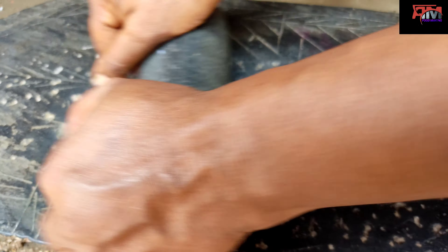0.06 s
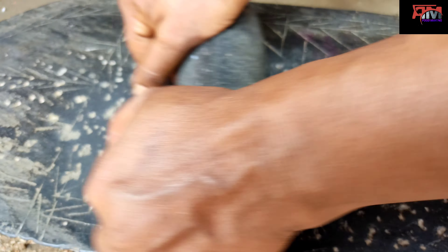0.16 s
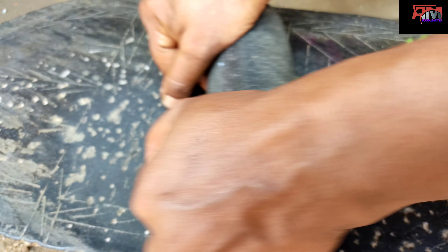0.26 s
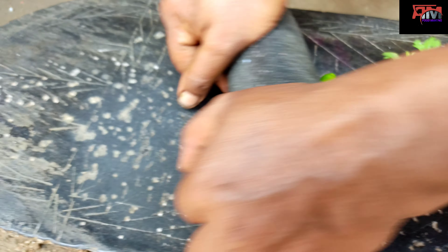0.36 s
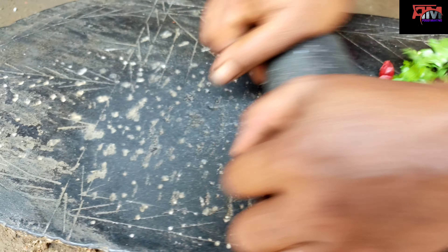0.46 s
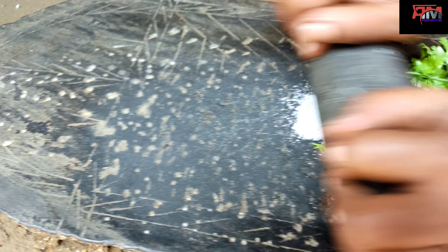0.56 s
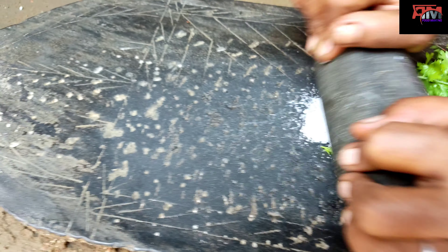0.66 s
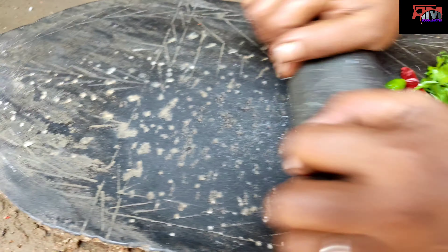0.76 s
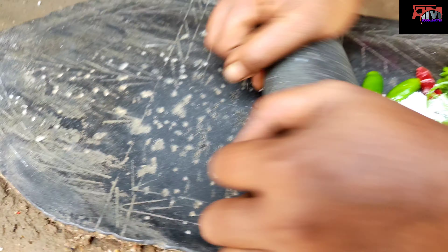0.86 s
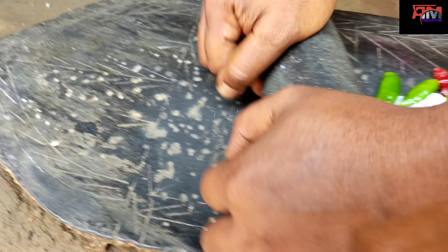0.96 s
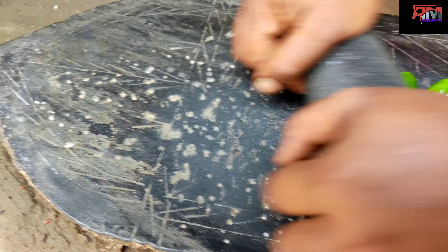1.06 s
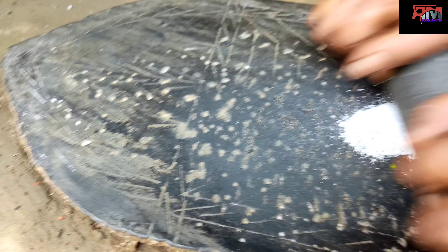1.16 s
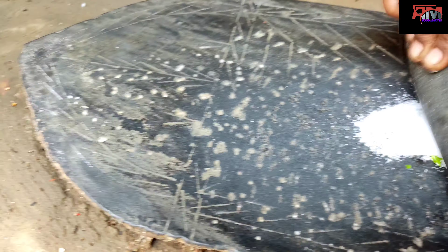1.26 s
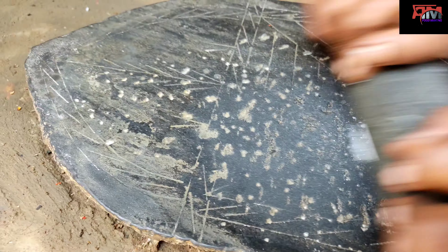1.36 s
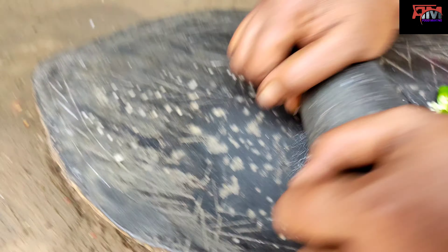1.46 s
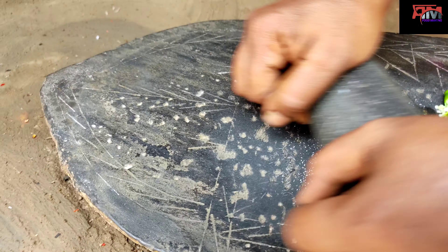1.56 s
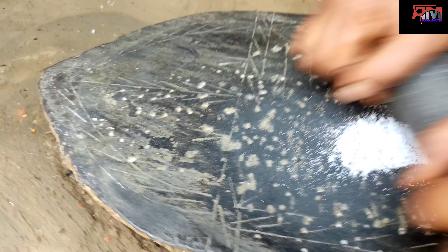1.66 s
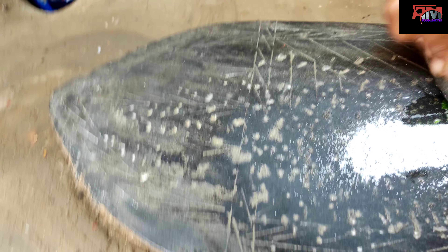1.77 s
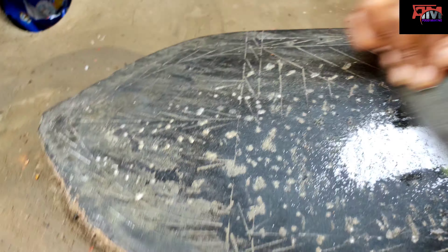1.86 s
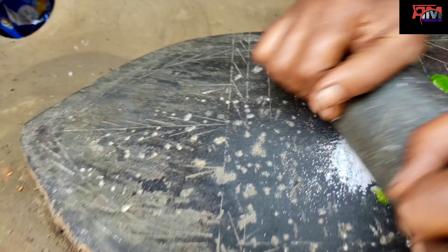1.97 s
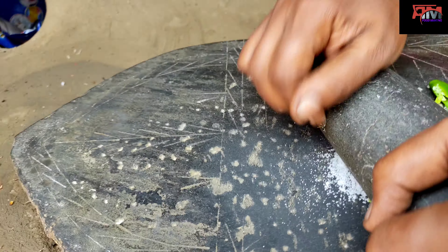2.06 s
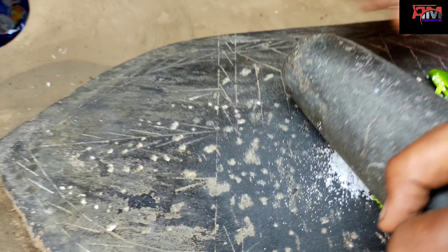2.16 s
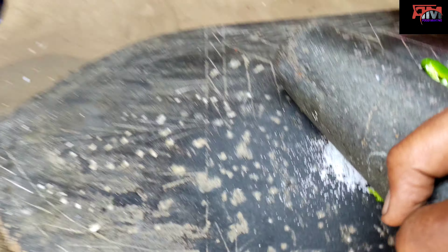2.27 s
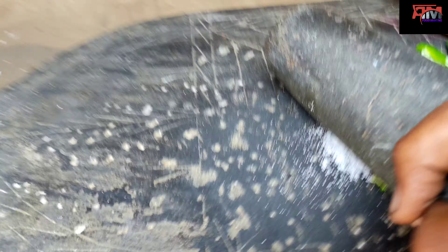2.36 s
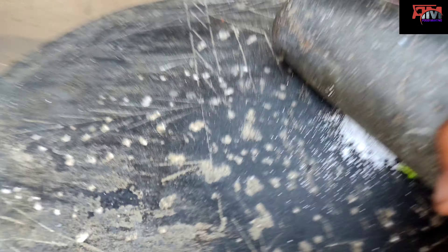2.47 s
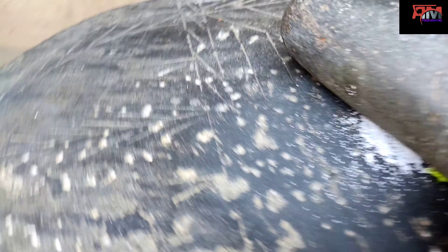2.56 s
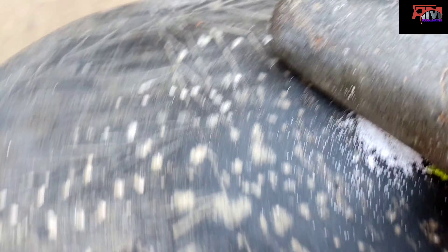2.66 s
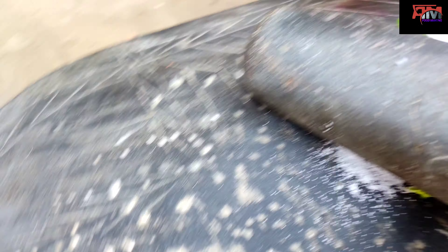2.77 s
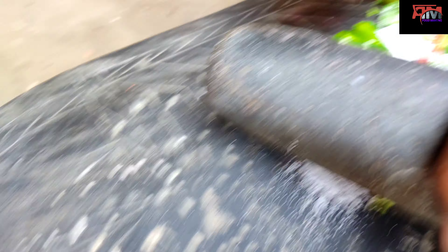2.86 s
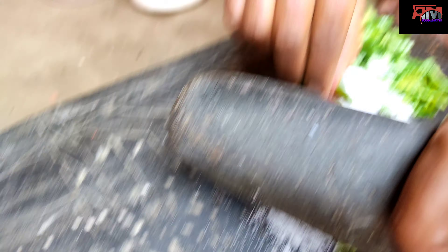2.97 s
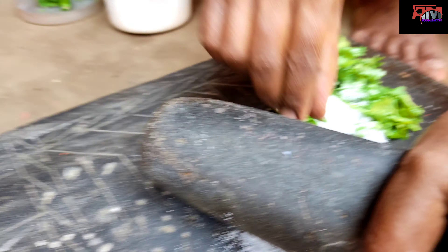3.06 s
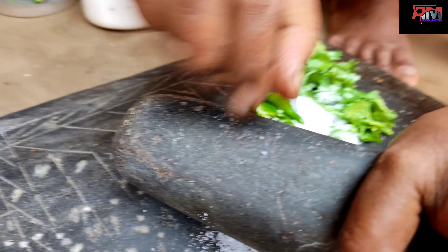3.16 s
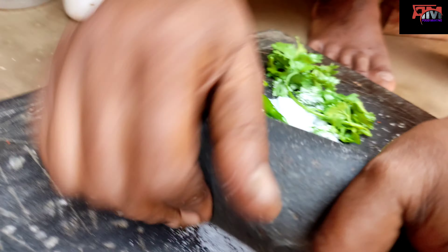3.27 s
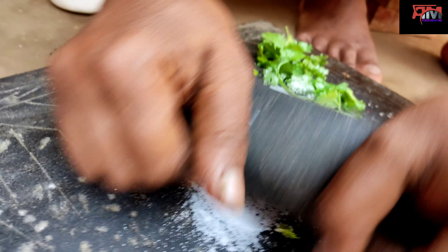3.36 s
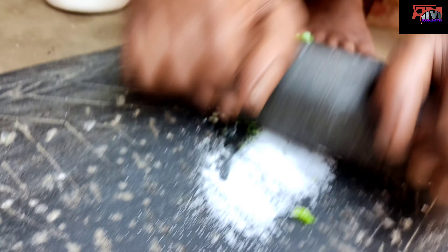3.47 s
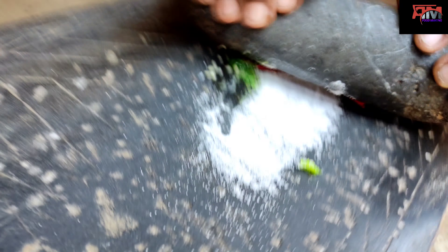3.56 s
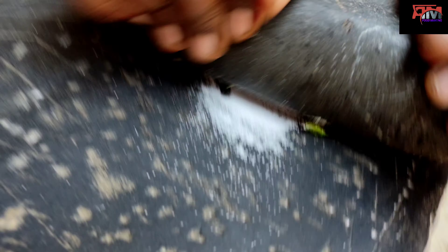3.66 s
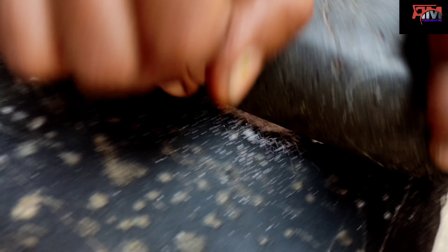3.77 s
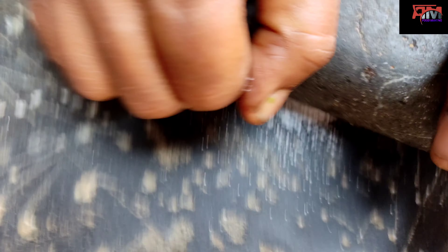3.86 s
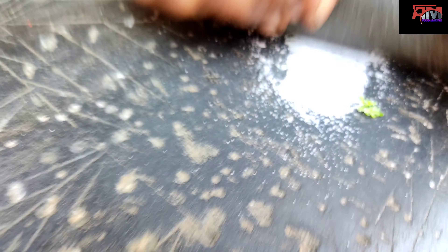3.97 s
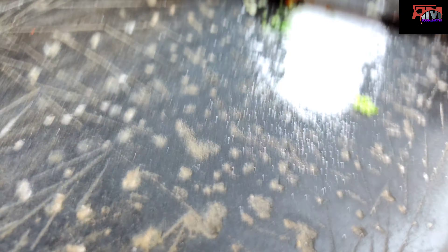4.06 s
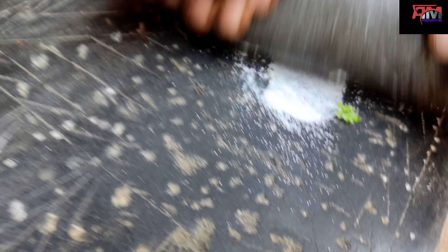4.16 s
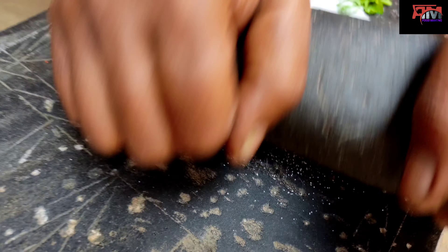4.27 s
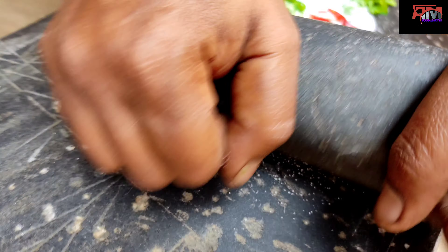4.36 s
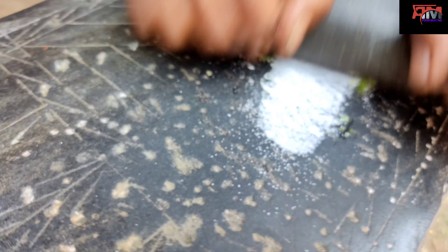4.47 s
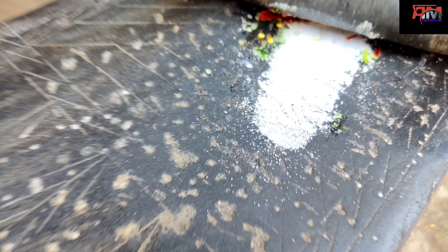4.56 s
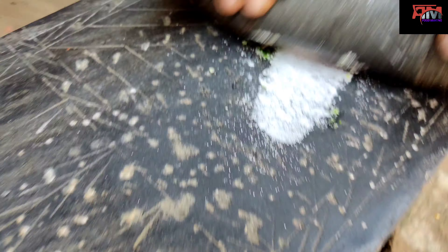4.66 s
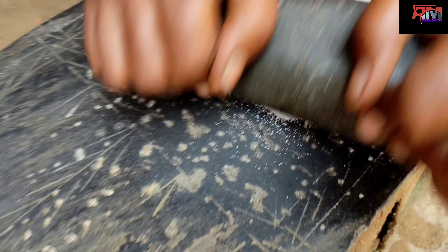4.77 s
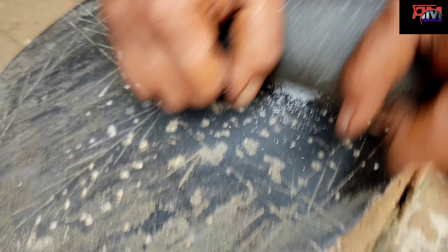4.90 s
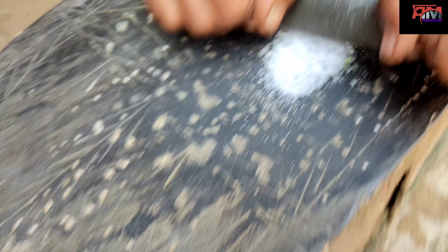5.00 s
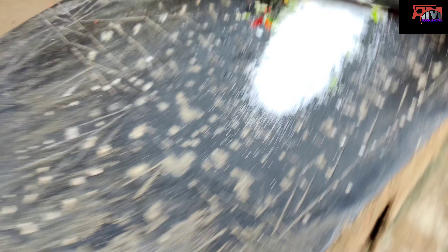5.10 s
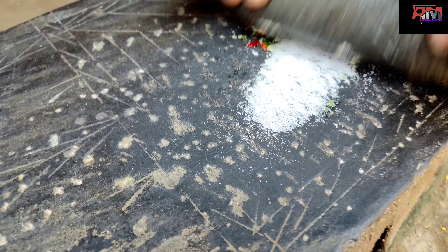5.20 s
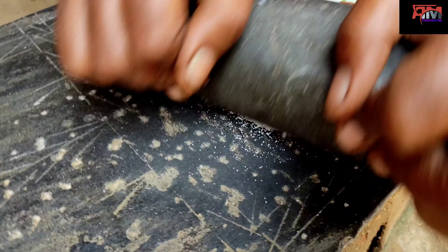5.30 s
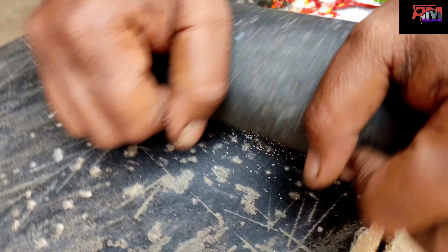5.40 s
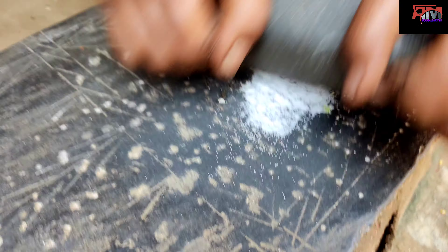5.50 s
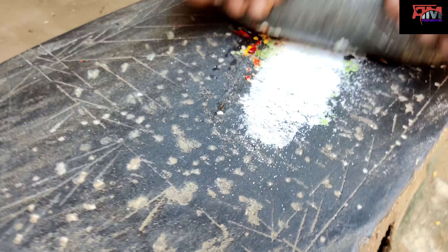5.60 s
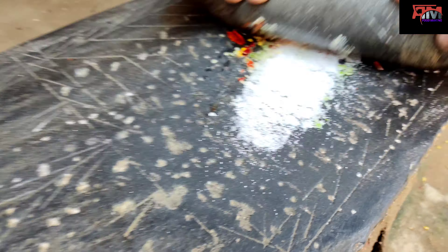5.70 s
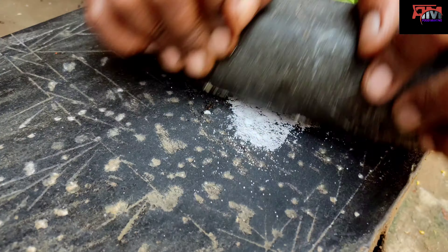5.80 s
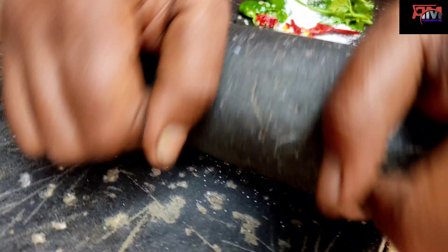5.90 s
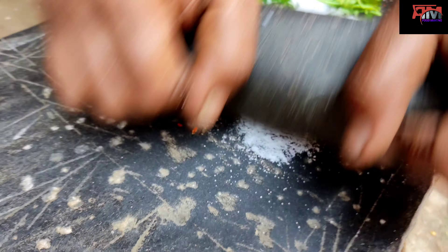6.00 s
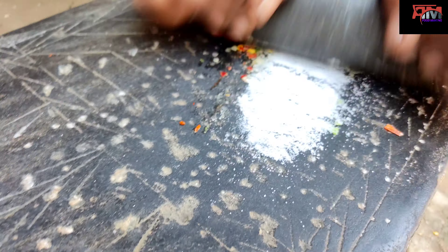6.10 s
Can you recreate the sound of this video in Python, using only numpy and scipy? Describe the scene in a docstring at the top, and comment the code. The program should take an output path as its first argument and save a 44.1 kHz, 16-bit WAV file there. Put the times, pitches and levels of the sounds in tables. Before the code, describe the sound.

Close by, a stone roller slides and scrapes unevenly over a flat stone slab, with a few hard knocks and stray grains snapping. It eases off briefly with a couple of dull bumps. Then it grinds through coarse salt in quick, regular back-and-forth strokes, the grains crunching brightly while the slab rumbles and the roller rings. The space is small and fairly dead, with a low airy hush and a very faint, distant insect.

```python
"""In a small, fairly dead room, a stone roller is worked to and fro on a stone slab close by.
It first slides, scrapes and is set down with hard knocks that excite the modes of both stones.
After a pause it is pushed through a heap of coarse salt: the grains crunch and snap by brittle
fracture, while friction between the pitted faces makes the slab rumble and the roller ring.
Under it lie a low airy noise and the faint trill of a far insect."""
import sys
import numpy as np
from scipy import signal
from scipy.fft import rfft, irfft
from scipy.io import wavfile
from scipy.ndimage import uniform_filter1d

SR = 44100
rng = np.random.default_rng(int(sys.argv[2]) if len(sys.argv) > 2 else 0)


def transcribe(u):
    """Save the signal u as a 16-bit wav file named by the first command-line argument.

    u: samples, shape (n,) or (channels, n), limited to [-1, 1]; the rate is SR.
    q: integer samples, one column per channel.
    """
    v = np.clip(np.atleast_2d(u).T, -1, 1)
    q = np.round(v * 32767).astype(np.int16)
    wavfile.write(sys.argv[1], SR, q)


N = 270774
TIME = np.arange(N) / SR

# Spectra: f/Hz, relative spectral level/dB
AIR_SPECTRUM = [(25, 3.5), (50, -5), (75, -4), (110, -6), (190, -1), (290, -11), (400, -4), (760, -14.5),
                (1260, -19.5), (1800, -19), (2400, -22.5), (2820, -22), (3900, -26.5), (6000, -31)]   # ambient noise
RUMBLE_SPECTRUM = [(50, -39), (95, -19), (165, -3.5), (230, -4.5), (350, 1), (470, -3.5), (590, -3.5),
                   (800, -9), (1100, -42.5), (2000, -43)]   # rubbed slab
BARE_RASP_SPECTRUM = [(450, -33), (750, 0), (950, -2.5), (1150, 0.5), (1400, -6), (1900, -9), (2800, -17),
                      (3400, -18.5), (4500, -18)]   # roller on bare stone
SALT_RASP_SPECTRUM = [(600, -23.5), (820, -9), (1000, -6), (1090, -17), (1200, -7.5), (1400, -7),
                      (1750, -13.5), (2200, -13.5), (2750, -13.5), (3400, -19), (4500, -37.5)]   # roller on salt
CLACK_SPECTRUM = [(80, -12), (200, -14), (450, -4), (750, -5), (1200, 12), (1800, 10), (2300, 6.5),
                  (2900, -7), (3500, -12), (5000, -36)]   # stone striking stone
SHUDDER_SPECTRUM = [(50, -35), (110, 3.5), (170, 4), (260, 5.5), (450, 6.5), (700, 3.5), (1500, -53),
                    (3000, -86)]   # struck slab shaking on the ground
FRACTURE_SPECTRUM = [(1500, -31), (2800, -15), (3700, -14), (4600, -13), (5200, -13), (6300, -6),
                     (7400, 0.5), (8600, -1.5), (9400, -11), (10300, -17), (12500, -15.5), (15500, -23.5)]   # grains breaking
BITE_SPECTRUM = [(1500, -3), (2800, -8), (3500, -10), (4400, -2.5), (5200, -6.5), (6200, -4), (7500, -9.5)]   # low-treble bite of a snapping grain
# Treble balance of the fractures: f/Hz, left-right/dB
TREBLE_BALANCE = [(1500, -15.5), (2800, -3.5), (4500, 2.5), (6500, -2), (7400, -6.5), (8400, 12),
                  (9500, 11), (12000, 2), (15500, 5)]

# Resonances: f/Hz, bandwidth/Hz, relative level/dB, left-right/dB
RASP_MODES = [(1079, 89, -1, 4), (1300, 140, 1.5, 1)]   # roller scraping bare stone
WEDGE_MODES = [(2600, 160, 0.5, -4.5), (3193, 110, 0, 1.5), (4570, 170, -9, -4), (5880, 150, 1.5, -1.5),
               (6490, 240, 0.5, -1)]   # wedge of air between roller and slab
SLAB_MODES = [(331, 35, -9.5, 7), (464, 26, 2, -11)]   # hollow growl of the slab
BOOM_MODES = [(165.4, 42, 0, 2)]   # deep boom of the whole slab
HOLLOW_MODES = [(350, 128, 0, -1)]   # hollow under the roller
ROLLER_MODES = [(1083, 36, -1, 0.5), (2820, 170, -13.5, -7)]   # roller under a firm push
ROLLER_HIGH_MODES = [(4530, 220, -8.5, -4.5), (5776, 81, -1, -9), (6560, 580, -8, -4)]   # its treble ring
GRIT_MODES = [(4400, 60, -10, -11), (5540, 38, -2, 11), (6330, 31, 1, -1), (6840, 38, 3, 12),
              (7455, 110, 10, -5.5), (7870, 54, 6, -5.5), (8220, 85, 6.5, 15.5), (8700, 76, 7, -7),
              (9030, 130, 7, 10), (9500, 50, -3.5, -8)]   # stones excited by breaking grains
# Resonances of the sliding roller: the same four columns, left-right correlation, onset delay/s
SLIDE_MODES = [(380, 190, -15.5, 6, 0.89, 0.2), (745, 73, -3, -3.5, 0.8, 0.16),
               (1164, 110, -2, 1, -0.59, 0.023), (1900, 270, -18, -14, -0.83, 0.079),
               (2950, 340, -16.5, -5.5, -0.26, 0.17)]
# Modes of the struck stones: f/Hz, level/dB, T60/s, left-right/dB, right lag/rad, share of bending
STRUCK_MODES = [(160.1, -17, 0.29, 1, 0.095, 0), (249, -11, 0.15, 3, .4, 0),
                (389, 5.5, 0.038, 4.5, 0.48, 0), (620, -3.5, 0.056, -3, 0.76, 0),
                (872, -7, 0.064, 12, 3.9, 0), (1075, -2, 0.069, 2.5, 0.74, 0.85),
                (1280, 7.5, 0.017, 8, 2.1, 0.01), (1407, 5.5, 0.058, -2, 1.6, 0.1),
                (1550, -6, 0.024, -7, 4.5, 0.8), (1940, -1.5, 0.005, 24, 0.73, 0),
                (2360, 10, 0.0082, 6, 0.56, 0.05), (2550, 2.5, 0.032, -16, 2.44, 0.24),
                (2870, -10.5, 0.079, -4, 2.4, 1), (3210, -19, 0.051, -6, 1.1, 0.75)]

# Insect chirps: t/s, duration/s, relative level/dB
INSECT_CHIRPS = [(0.0, 0.14, -60), (0.243, 0.13, -55.5), (0.387, 0.11, -61.5), (0.966, 0.067, -59.5),
                 (2.57, 0.11, -63), (2.678, 0.12, -56.5), (2.815, 0.092, -57), (2.954, 0.11, -58),
                 (3.121, 0.11, -68.5), (3.233, 0.073, -61.5)]
# The slab bumps on the ground: t/s, level/dB
SLAB_BUMPS = [(2.382, -36), (2.957, -46.5)]
# The roller catches and groans: t/s, half-width/s, f/Hz, level/dB
ROLLER_GROANS = [(0.882, 0.018, 860, -37), (1.169, 0.02, 1110, -44.5), (1.99, 0.027, 1095, -44)]
# Knocks, levels relative: t/s, level/dB, contact cutoff/Hz, slab thud/dB, roller bending/dB,
# struck spot f/Hz, struck spot/dB, clack/dB, rebound/dB
ROLLER_KNOCKS = [(0.646, -15, 3300, -5.5, -11, 1380, 5, 7, -18),
                 (0.7343, -35.5, 2500, 2, -7.5, 1363, -0.5, -0.5, -13.5),
                 (1.11, -42.5, 2576, 0.5, -11, 1300, -7.5, 0.5, -14),
                 (1.3051, -16, 2760, -3, -10, 2530, 11.5, 4, -14),
                 (1.8772, -31, 1900, 4, -10, 1305, 17, 0, -18),
                 (1.9410, -38.5, 1900, 3, 2, 1324, 17.5, 0.5, -14),
                 (2.1357, -44, 1333, 12, 25, 1260, 12, 5.5, -12), (2.804, -51, 1310, 6, -3, 900, 14, 0, -9),
                 (3.7247, -27, 3275, 4.5, 15.5, 3050, 4.5, 2, -5.5),
                 (4.0731, -27.5, 2870, 0, 0.5, 1438, 5, -3, -11),
                 (4.2175, -23, 4520, 2.5, 19, 1427, 14.5, 1, -19)]
# Strokes on nearly bare stone, levels relative: t/s, duration/s, rumble/dB, rasp/dB, grit/dB, ring/dB
SCRAPES = [(0.46, 0.16, -45.5, -42.5, -46.5, -47.5), (0.6, 0.15, -45, -43, -38.5, -45.5),
           (0.74, 0.22, -39, -38, -44, -47.5), (0.83, 0.11, -40.5, -38, -64, -52.5),
           (1.09, 0.23, -40, -39.5, -53.5, -48), (1.28, 0.34, -35, -35.5, -46, -44),
           (1.61, 0.37, -43, -41.5, -47, -47.5), (1.868, 0.22, -36, -39, -37, -43.5),
           (2.04, 0.28, -65, -50.5, -55, -57.5), (2.47, 0.46, -70, -53.5, -44.5, -55.5),
           (3.07, 0.12, -70, -56, -46.5, -52), (3.21, 0.21, -59, -55.5, -44.5, -56)]
# Strokes in salt: the same six columns, boom/dB, delay to the heap/s, heap crunch/dB
SALT_PULLS = [(3.309, 0.29, -41, -40.5, -39.5, -48, -55.5, 0.25, -23),
              (3.891, 0.25, -39, -38, -44, -44, -49, 0.17, -23),
              (4.42, 0.235, -40.5, -37.5, -43.5, -37.5, -46.5, 0.19, -33),
              (4.932, 0.27, -43, -40, -46.5, -39, -50.5, 0.17, -30),
              (5.48, 0.245, -44.5, -42, -44, -42, -50, 0.155, -34),
              (6.003, 0.38, -41.5, -38.5, -41, -37, -51, 0.16, -33.5)]
SALT_PUSHES = [(3.618, 0.23, -39, -39, -38.5, -42.5, -45.5, 0.058, -14.5),
               (4.126, 0.27, -39, -39, -47, -40, -58.5, 0.069, -21),
               (4.663, 0.24, -36.5, -39, -42.5, -35, -55, 0.057, -26.5),
               (5.196, 0.26, -39, -38, -44, -37.5, -46.5, 0.066, -29.5),
               (5.717, 0.28, -41, -41, -48, -38, -50.5, 0.11, -28.5)]
# Stray patches of grains under the roller: t/s, half-width/s, level/dB
GRAIN_PATCHES = [(0.324, 0.029, -43), (0.567, 0.039, -35.5), (0.769, 0.036, -35), (0.834, 0.013, -30),
                 (1.261, 0.057, -43), (1.402, 0.063, -33.5), (2.65, 0.016, -41.5), (4.822, 0.013, -42.5),
                 (5.453, 0.036, -38)]
# Single coarse grains snap: t/s, relative level/dB, low-treble bite/dB
GRAIN_SNAPS = [(0.309, -20, -19), (0.354, -26.5, -2), (0.4852, -28, -5), (0.5421, -27.5, 10.5),
               (0.5492, -29, 12), (0.629, -23.5, 1), (0.636, -20.5, 2), (0.641, -19, 1.5), (0.653, -20, 0),
               (0.7455, -25, 4), (0.77, -19.5, 3), (0.8092, -16, 9), (0.8176, -11.5, -4), (0.964, -34, 5.5),
               (1.0827, -36, -1.5), (1.2518, -21.5, 3.5), (1.2598, -20.5, 1.5), (1.2864, -19.5, -3),
               (1.372, -22, 7), (1.3982, -21.5, 8.5), (1.8252, -17.5, -11.5), (2.9617, -34, -17),
               (3.058, -31.5, -7), (3.116, -27.5, -3.5), (3.5383, -14.5, 5.5), (3.561, -13, -12.5),
               (3.574, -15.5, -14), (3.5813, -9.5, -21.5), (3.6328, -16, -5), (3.6473, -18.5, -13),
               (3.662, -24, -23), (4.024, -31, -14.5), (4.0568, -11, -20), (4.0831, -15, -20),
               (4.1263, -11, -20), (4.137, -10, -28), (4.6773, -21, -18), (4.6968, -17.5, 1),
               (5.1928, -17, -20), (5.2152, -7.5, -30), (5.2245, -22.5, -24.5)]

# Swell of a stroke: (skew, under 1 peaks early; steepness)
SLIDE_SHAPE, SCRAPE_SHAPE, PULL_SHAPE, PUSH_SHAPE = (0.88, 2.1), (0.73, 1.71), (1.06, 1), (0.69, 1.15)
RING_PULL_SHAPE, RING_PUSH_SHAPE = (1.03, 3), (0.66, 2.04)
SLIDE_START_S, SLIDE_LENGTH_S = -0.037, 0.51


def from_db(db):
    """Amplitude ratio of a level in decibels."""
    return 10 ** (np.asarray(db) / 20)


def to_db(gain):
    """Level in decibels of an amplitude ratio."""
    return 20 * np.log10(gain + 1e-6)


def rms_one(x):
    """Normalisation to unit mean power."""
    return x / np.sqrt(np.mean(x ** 2) + 1e-20)


def panned(db):
    """Direction by level difference: left and right gains."""
    return from_db(np.array([[db], [-db]]) / 2)


def lowpass(order, hz):
    """Maximally flat low-pass filter sections."""
    return signal.butter(order, hz, fs=SR, output="sos")


def resonator(hz, width_hz):
    """Second-order resonance as a band-pass section."""
    return signal.butter(1, [hz - width_hz / 2, hz + width_hz / 2], "band", fs=SR, output="sos")


def colour(x, spectrum):
    """Minimum-phase filtering: a folded cepstrum gives a causal response with this spectrum."""
    size = 2048
    hz, db = np.transpose(spectrum)
    log_hz = np.log(np.maximum(np.arange(size + 1) * SR / size / 2, 1))
    outside = np.maximum(np.log(hz[0]) - log_hz, 0) + np.maximum(log_hz - np.log(hz[-1]), 0)
    cepstrum = irfft(np.log(from_db(np.interp(log_hz, np.log(hz), db) - 20 * outside)))
    cepstrum[1:size] *= 2
    cepstrum[size + 1:] = 0
    response = irfft(np.exp(rfft(cepstrum)))[:size]
    return signal.fftconvolve(np.atleast_2d(x), response[None], axes=1)[:, :x.shape[-1]]


def drift(per_s):
    """Random modulation of unit rms, interpolated between knots."""
    knots = rng.standard_normal(int(TIME[-1] * per_s) + 2)
    return rms_one(np.interp(TIME * per_s, np.arange(len(knots)), knots))


def read_at(x, positions):
    """Linear interpolation of both sides at fractional sample positions."""
    return np.array([np.interp(positions, np.arange(N), side) for side in x])


def bend(x, pitch):
    """Resampling scales all frequencies by a time-varying ratio."""
    return read_at(x, np.cumsum(pitch) % (N - 1))


def impacts(per_s, spread_db):
    """Shot noise: independent impulses of random size and sign, at unit rms."""
    chance = np.clip(per_s / SR, 1e-4, 1)
    sizes = from_db(spread_db * np.minimum(rng.exponential(1, N), 4)) * rng.choice([-1, 1], N)
    return rms_one((rng.random(N) < chance) * sizes / np.sqrt(chance))


def contact(per_s, spread_db, alike):
    """Partial correlation: some impacts reach both sides alike, others only one."""
    shared, left, right = (impacts(per_s, spread_db) for _ in range(3))
    common = np.sqrt(abs(alike)) * np.array([shared, np.sign(alike) * shared])
    return common + np.sqrt(1 - abs(alike)) * np.array([left, right])


def resonate(modes, per_s, alike, wander_db, shift=0):
    """Forced resonance: impacts ring modes whose level and pitch wander as the contact moves."""
    out = 0
    drives = [contact(per_s, spread_db=1.0, alike=alike) for _ in range(2)]
    for k, (hz, width, db, pan_db) in enumerate(modes):
        peak_and_skirt = np.vstack([resonator(hz, width), resonator(hz, min(5 * width, hz))])
        mode = rms_one(signal.sosfilt(peak_and_skirt, drives[k % 2] + 1e-18))
        if shift:
            mode = bend(mode, 1 + shift * np.tanh(drift(7)))
        out = out + from_db(db + wander_db * np.tanh(drift(16))) * panned(pan_db) * mode
    return rms_one(out)


def echoes(x, t60, dull_hz):
    """Diffuse reverberation: an exponentially decaying noise tail, different on each side."""
    t = np.arange(int(t60 * SR) + 2) / SR
    tail = rng.standard_normal((2, len(t))) * from_db(-60 * t / t60) * (1 - np.exp(-20 * t / t60))
    tail /= np.sqrt(np.sum(tail ** 2, axis=1, keepdims=True))
    tail = signal.sosfilt(lowpass(1, dull_hz), tail)
    return signal.fftconvolve(x, tail, axes=1)[:, :N]


def speed(start, length, shape, turn_s=0.031):
    """A swell within 0-1, smoothed as inertia smooths the start and stop of a stroke."""
    skew, steepness = shape
    progress = np.clip((TIME - start) / length, 0, 1)
    swell = np.abs(np.sin(np.pi * progress ** skew)) ** steepness
    return np.abs(uniform_filter1d(swell, 2 * int(turn_s * SR) + 1))


def strokes(rows, shape, count):
    """Friction noise follows speed: a gain curve for each of the first `count` level columns."""
    return sum(from_db(levels[:count])[:, None] * speed(start, length, shape)
               for start, length, *levels in rows)


def salt_strokes():
    """Superposed pulls and pushes: gains of rumble, rasp, grit, ring and boom."""
    return strokes(SALT_PULLS, PULL_SHAPE, count=5) + strokes(SALT_PUSHES, PUSH_SHAPE, count=5)


def crossing(s, half_width_s, db):
    """Gaussian envelope of the roller passing over one spot."""
    return from_db(db) * np.exp(-((TIME - s) / half_width_s) ** 2)


def air():
    """Ambient noise: dense shot noise merges into a low, airy hush."""
    return from_db(-51.95) * rms_one(colour(contact(20000, 0.33, alike=0.56), AIR_SPECTRUM)) * panned(3.4)


def insect(carrier_hz=2800, trill_hz=37):
    """Amplitude modulation of a thin tone gives a far insect's trill, which swells and ebbs."""
    pitch_hz = carrier_hz + 20 * drift(220)
    swell = from_db(-74) + sum(from_db(db) * speed(s, length, (1, .5)) for s, length, db in INSECT_CHIRPS)
    pulse_hz = trill_hz * (1 + 0.13 * drift(4.5))
    trill = 1 + 0.13 * np.sin(2 * np.pi * np.cumsum(pulse_hz) / SR)
    flicker = from_db(2.6 * drift(83) + 2.0)
    return swell * trill * flicker * np.sin(2 * np.pi * np.cumsum(pitch_hz) / SR)


def bumps(start_hz=326, end_hz=50.1, fall_s=0.0148, swell_s=0.0064):
    """Damped oscillation of the slab on the ground, dropping in pitch as the weight settles."""
    out = 0
    for s, db in SLAB_BUMPS:
        t = np.clip(TIME - s, 0, 1)
        pitch_hz = end_hz + (start_hz - end_hz) * np.exp(-t / fall_s)
        swell = t / swell_s * np.exp(1 - t / swell_s)
        out = out + from_db(db) * swell * np.sin(2 * np.pi * np.cumsum(pitch_hz * (t > 0)) / SR)
    return out * panned(5.7)


def groans(fall_octaves_per_s=6):
    """Stick-slip of stone on stone briefly drives one falling resonance."""
    out = 0
    for s, half_width_s, hz, db in ROLLER_GROANS:
        pitch = 2 ** np.clip(fall_octaves_per_s * (s - TIME), -.5, .5)
        tone = resonate([(hz, 140, 0, 0)], per_s=900, alike=0.47, wander_db=0.5)
        out = out + crossing(s, half_width_s, db) * bend(tone, pitch)
    return out


def slide(sag_per_s=0.36):
    """Light sliding friction excites broad resonances of the loose roller, which sink as it travels."""
    out, elapsed = 0, TIME - SLIDE_START_S
    for hz, width, db, pan_db, alike, after in SLIDE_MODES:
        skirt = signal.butter(1, [hz * .7, hz / .7], "band", fs=SR, output="sos")
        mode = signal.sosfilt(np.vstack([resonator(hz, width), skirt]), contact(2500, 1.9, alike))
        onset = (1 + np.tanh((elapsed - after) / 0.036)) / 2
        out = out + from_db(db) * panned(pan_db) * onset * rms_one(mode)
    pitch = 1 - sag_per_s * (np.clip(elapsed, 0, SLIDE_LENGTH_S) - SLIDE_LENGTH_S / 2)
    sinking = rms_one(read_at(out, np.cumsum(pitch)))
    return speed(SLIDE_START_S, SLIDE_LENGTH_S, SLIDE_SHAPE) * from_db(-34 + 2.0 * drift(74)) * sinking


def rubbing(rumble_db, rasp_db, rasp_spectrum, judder_db):
    """Roughness noise: pits catch on each other, so the slab rumbles, the roller rasps, both judder."""
    judder = from_db(judder_db * drift(90))
    catches = contact(3000, spread_db=1.5, alike=0.93) * np.sqrt(judder)   # the heavy slab judders less
    slab = rms_one(colour(catches, RUMBLE_SPECTRUM)) * panned(3.7)
    roller = rms_one(colour(contact(1500, spread_db=-1.0, alike=0.06) * judder, rasp_spectrum))
    return from_db(rumble_db) * slab + from_db(rasp_db) * roller


def scraping():
    """Friction on nearly bare stone drives the resonances of the roller and the air wedge beneath it."""
    slab_db, roller_db, _, ring_db = to_db(strokes(SCRAPES, SCRAPE_SHAPE, count=4))
    rasp = resonate(RASP_MODES, per_s=600, alike=0.26, wander_db=-0.5, shift=0.02)
    rasp *= from_db(roller_db - 11.5)
    ring = resonate(WEDGE_MODES, per_s=600, alike=0.053, wander_db=-0.5, shift=0.012)
    ring *= from_db(ring_db) + from_db(-51.5) * speed(SLIDE_START_S, SLIDE_LENGTH_S, SLIDE_SHAPE)
    flicker = from_db(2.0 * drift(90))
    friction = rubbing(slab_db - 2.5, roller_db - 4.5, BARE_RASP_SPECTRUM, judder_db=4.0)
    return flicker * (rasp + ring) + friction


def struck_modes(t, thud_db, bend_db):
    """Free modal decay: where the blow lands decides how much the slab thuds and the roller bends."""
    out = 0
    for k, (hz, db, t60, pan_db, lag, bending) in enumerate(STRUCK_MODES):
        place_db = thud_db if hz < 900 else bending * bend_db
        swell = 1 - np.exp(-t * hz / 0.27)   # low modes build up more slowly
        gripped_hz = hz * (1 + 0.0047 * rng.standard_normal())   # the grip detunes each mode
        phase = 2 * np.pi * gripped_hz * t + np.array([[lag], [-lag]]) / 2
        ring = swell * np.sin(phase) * from_db(-60 * t / t60)
        out = out + (-1) ** k * from_db(db + place_db - 1.0) * panned(pan_db) * ring
    return out


def knocks(rebound_s=0.006, spot_t60_s=0.047, spot_split=0.025):
    """Impact excitation: a clack, a low shudder and ringing modes; softer contact cuts the treble."""
    t = np.arange(SR // 3) / SR
    out = np.zeros((2, N + len(t)))
    for s, db, hard_hz, thud_db, bend_db, spot_hz, spot_db, clack_db, rebound_db in ROLLER_KNOCKS:
        chatter = rng.standard_normal((2, len(t))) * np.exp(-t / 0.0065)   # faces grate as they settle
        touches = (t == 0) + from_db(rebound_db) * (np.arange(len(t)) == int(rebound_s * SR))
        blow = from_db(clack_db) * colour(from_db(18) * touches + chatter, CLACK_SPECTRUM)
        shudder = colour(rng.standard_normal(len(t)) * np.exp(-t / 0.0095), SHUDDER_SPECTRUM)
        blow += from_db(thud_db + 5.0) * panned(4.6) * shudder
        blow += struck_modes(t, thud_db, bend_db)
        # the struck spot rings as a close pair of tones
        pair = sum(np.sin(2 * np.pi * spot_hz * (1 + side * spot_split / 2) * t) for side in (-1, 1))
        blow += from_db(spot_db - 16.5) * pair * from_db(-60 * t / spot_t60_s)
        start = int(s * SR)
        out[:, start:start + len(t)] += from_db(db) * signal.sosfilt(lowpass(2, hard_hz), blow)
    return out[:, :N]


def hollow(fall_octaves=0.6):
    """Cavity resonance: the hollow under the roller growls and sinks in pitch through each push."""
    octaves = sum(fall_octaves * (.5 - (TIME - start) / length) * (TIME > start) * (TIME < start + length)
                  for start, length, *_ in SALT_PUSHES)
    growl = bend(resonate(HOLLOW_MODES, per_s=700, alike=0.45, wander_db=1.0), 2 ** octaves)
    return from_db(-0.5) * strokes(SALT_PUSHES, PUSH_SHAPE, count=1)[0] * growl


def grinding():
    """Forced vibration in the salt: the slab growls and booms, and the roller rings."""
    slab_db, roller_db, _, ring_db, boom_db = to_db(salt_strokes())
    growl = from_db(slab_db - 12) * resonate(SLAB_MODES, per_s=1900, alike=0.39, wander_db=-0.7)
    boom = from_db(boom_db) * resonate(BOOM_MODES, per_s=1500, alike=0.85, wander_db=-2.5)
    pull_ring = strokes(SALT_PULLS, RING_PULL_SHAPE, count=4)[3]
    push_ring = strokes(SALT_PUSHES, RING_PUSH_SHAPE, count=4)[3]
    ring = resonate(ROLLER_MODES, per_s=2700, alike=0.51, wander_db=2.0, shift=0.025)
    ring *= from_db(-4) * (pull_ring + push_ring)
    fits = rms_one(from_db(4 * np.tanh(drift(45))))   # the high modes catch only in fits
    high_ring = resonate(ROLLER_HIGH_MODES, per_s=600, alike=0.067, wander_db=6.5, shift=0.014)
    high_ring *= from_db(ring_db - 3.5) * fits
    resonances = growl + boom + hollow() + ring + high_ring
    return resonances + rubbing(slab_db - 6.5, roller_db - 7, SALT_RASP_SPECTRUM, judder_db=3.0)


def brighten(cracks):
    """Spectral shaping: fractures sound bright, with a different treble on each side."""
    bright = colour(cracks, FRACTURE_SPECTRUM)
    return np.vstack([colour(side, [(hz, sign * db / 2) for hz, db in TREBLE_BALANCE])
                      for side, sign in zip(bright, (1, -1))])


def snaps(splinter_s=0.0032):
    """Brittle fracture of a coarse grain: a crack and splinters; some snaps add a low-treble bite."""
    t = np.arange(SR // 40) / SR
    cracks, bites = np.zeros((2, 2, N + len(t)))
    for s, db, bite_db in GRAIN_SNAPS:
        splinters = rng.standard_normal((3, len(t))) * np.exp(-t / splinter_s)
        burst = from_db(db + 1.5) * (1.1 * (t == 0) + 0.11 * splinters[0] + 0.74 * splinters[1:])
        start = int((s + 0.00056) * SR)
        cracks[:, start:start + len(t)] += burst
        bites[:, start:start + len(t)] += from_db(bite_db - 3) * burst
    softened = signal.sosfilt(lowpass(3, 10500), cracks[:, :N])
    return brighten(softened) + colour(bites[:, :N], BITE_SPECTRUM)


def moving_contact(cracks, stretch_s=0.17):
    """Modal overlap: each stretch of the way rings a different crowd of the stones' high modes."""
    out, hop = np.zeros((2, 2 * N)), int(stretch_s * SR)
    for centre in range(0, N + hop, hop):
        near = np.arange(max(centre - hop, 0), min(centre + hop, N))
        window = np.cos(np.pi / 2 * (near - centre) / hop)
        ring = echoes(cracks[:, near] * window, t60=0.055, dull_hz=15400)
        out[:, near[0]:near[0] + ring.shape[1]] += ring
    return out[:, :N]


def wedge_echo(x, delay_s=0.0017, reflection=0.3):
    """Comb filtering by one echo between roller and slab, whose delay wanders as the roller moves."""
    lag = delay_s * SR * (1 + 0.013 * drift(8.7))
    return rms_one(x + reflection * read_at(x, np.arange(N) - lag))


def pings(per_s, modes=44, t60_s=0.15):
    """Impulse response: each bursting grain rings one of the stones' many high modes."""
    out = 0
    count = int(np.mean(per_s) * TIME[-1] / modes) + 1
    cumulative_share = np.cumsum(per_s) / np.sum(per_s)
    radius = from_db(-60 / (t60_s * SR))
    for hz in np.geomspace(2396, 14550, modes):
        onsets = np.searchsorted(cumulative_share, rng.random(count)).clip(0, N - 1)
        clicks = np.zeros((2, N))
        clicks[:, onsets] = rng.standard_normal((2, count))
        angle = 2 * np.pi * hz * rng.uniform(.98, 1.02) / SR
        poles = [1, -2 * radius * np.cos(angle), radius ** 2]
        ring = signal.lfilter([0, np.sin(angle)], poles, clicks + 1e-18)
        out = out + np.sqrt(hz) * ring   # even power per Hz
    return rms_one(out / np.sqrt(per_s))


def heap(rows, half_width_s, spread, edge_s=0.0096):
    """Envelope of the passes through the heap, its width scaled by `spread` from pass to pass."""
    return sum(crossing(start + after, half_width_s * spread ** k, db)
               * np.clip((TIME - start) / edge_s, 0, 1)
               for k, (start, *_, after, db) in enumerate(rows))


def crushing_levels():
    """Incoherent sources add in power: levels of breaking grains on bare stone and in the salt."""
    sliding = from_db(-58) * speed(SLIDE_START_S, SLIDE_LENGTH_S, SLIDE_SHAPE)
    resting = from_db(-56.5)   # grains creak even while the roller turns round
    bare = [sliding, strokes(SCRAPES, SCRAPE_SHAPE, count=3)[2], resting]
    bare += [crossing(*patch) for patch in GRAIN_PATCHES]
    salt = [salt_strokes()[2], heap(SALT_PULLS, 0.04, spread=0.97), heap(SALT_PUSHES, 0.048, spread=1.102)]
    return [to_db(np.sqrt(sum(gain ** 2 for gain in gains))) for gains in (bare, salt)]


def crunch():
    """Brittle fracture in bulk: more pressure breaks more grains a second and rings the stones."""
    bare_db, salt_db = crushing_levels()
    level_db = np.maximum(bare_db, salt_db)
    per_s = 2800 * from_db(.45 * (level_db + 36.5))
    clumps = from_db(1.9 * drift(300) + 0.9 * drift(90))   # grains give way in clumps
    fine = contact(per_s, spread_db=0.5, alike=0.2)
    coarse = contact(130 + per_s / 40, spread_db=-1.0, alike=0.86)
    cracks = wedge_echo(brighten(moving_contact(fine + .5 * coarse) + 0.28 * coarse))
    # firm pressure bursts grains and makes the strongest modes sing
    burst_share = 0.6 * np.clip(from_db(level_db + 35), 0, 1)
    bursts = rms_one(brighten(pings(1200 + per_s / 10)))
    cracks = np.sqrt(1 - burst_share) * cracks + np.sqrt(burst_share) * bursts
    ring_share = np.clip(0.4 * from_db(0.46 * (level_db + 36)), 0, .4)
    ring = resonate(GRIT_MODES, per_s, alike=0.035, wander_db=7.5, shift=0.018)
    sound = rms_one(clumps * (np.sqrt(1 - ring_share) * cracks + np.sqrt(ring_share) * ring))
    # light rubbing lacks the sharpest cracks, and the heap of salt gives the most
    dull = signal.sosfiltfilt(lowpass(5, 9900), sound)
    sharp_db = np.maximum(bare_db - 7, salt_db + 41)
    sharpness = np.clip(from_db(0.12 * sharp_db), 0, 1.3)
    return from_db(level_db) * (dull + sharpness * (sound - dull)) * panned(-0.79)


def scene():
    """Superposition of the stones' direct sound, its short room reverberation and the background."""
    stones = slide() + scraping() + groans() + grinding() + crunch() + snaps() + knocks() + bumps()
    return stones + from_db(-9.5) * echoes(stones, t60=0.2, dull_hz=3140) + air() + insect()


def record(dry):
    """Clipping at full scale, then band limiting by a steep low-pass."""
    cutoff_hz = 15750
    return signal.sosfilt(signal.ellip(10, .1, 80, cutoff_hz, fs=SR, output="sos"), np.clip(dry, -1, 1))


dry = scene()
out = record(dry)
transcribe(out)
```